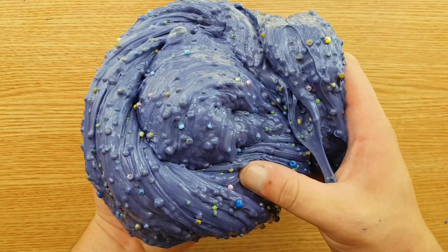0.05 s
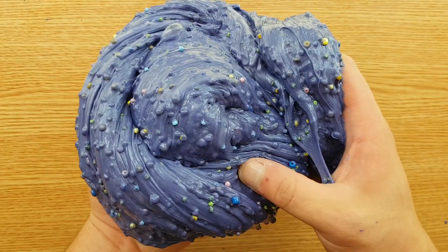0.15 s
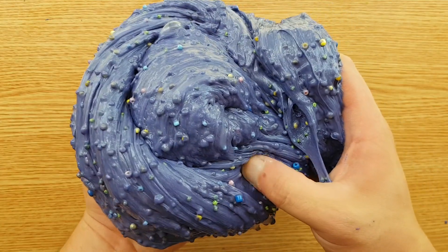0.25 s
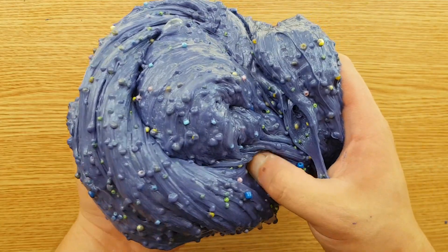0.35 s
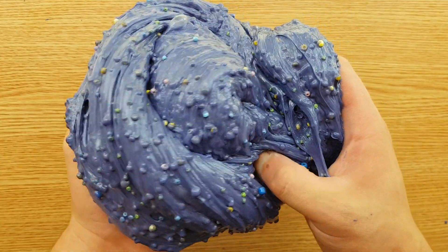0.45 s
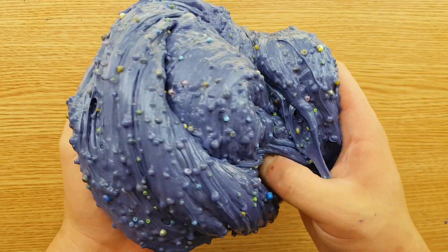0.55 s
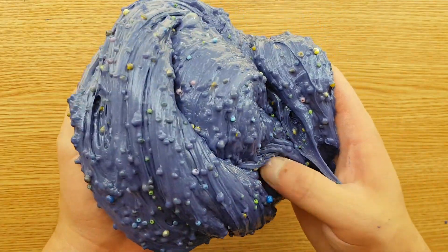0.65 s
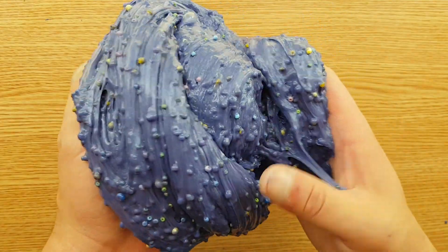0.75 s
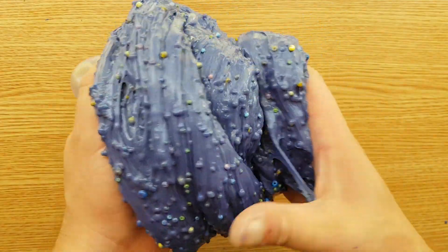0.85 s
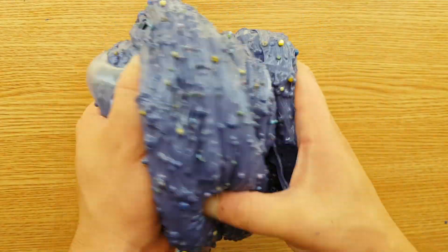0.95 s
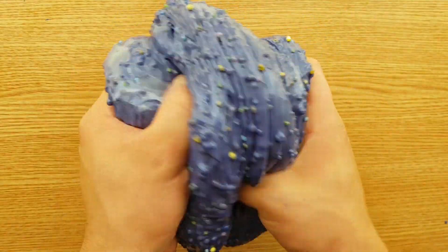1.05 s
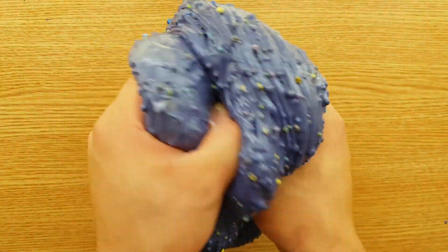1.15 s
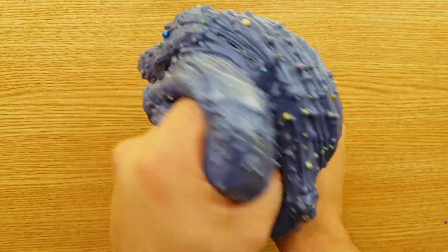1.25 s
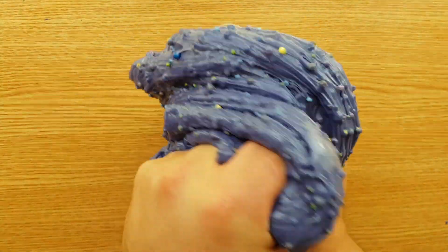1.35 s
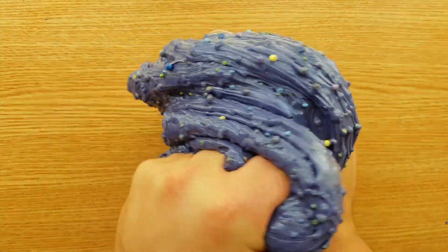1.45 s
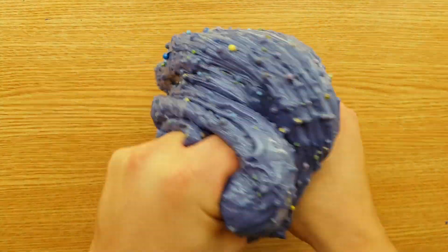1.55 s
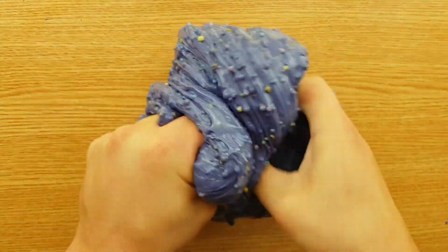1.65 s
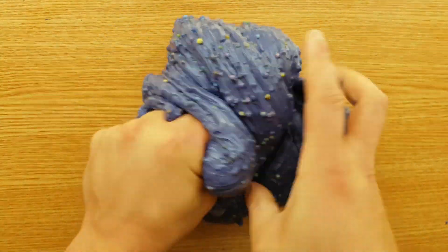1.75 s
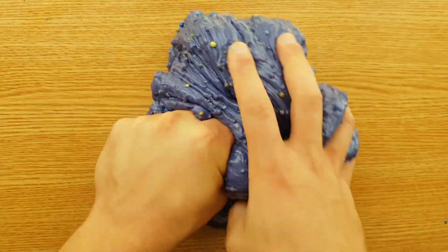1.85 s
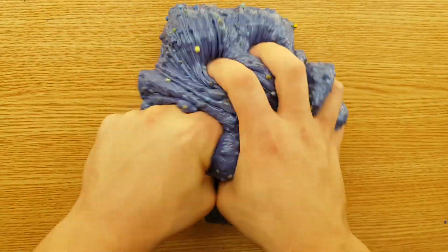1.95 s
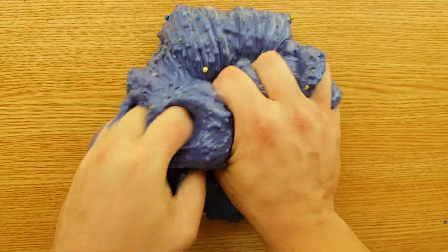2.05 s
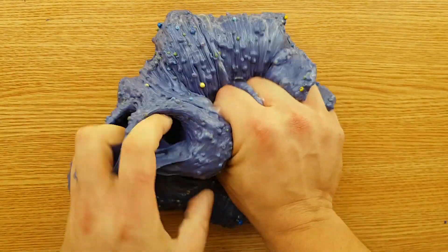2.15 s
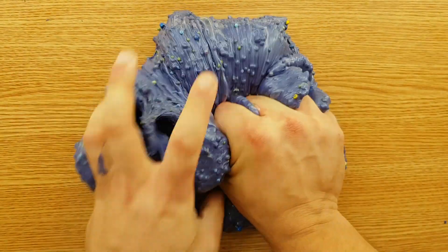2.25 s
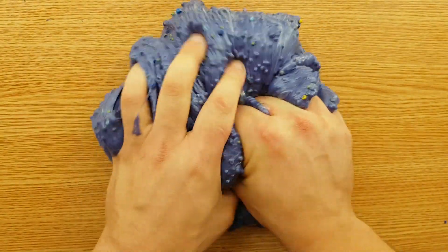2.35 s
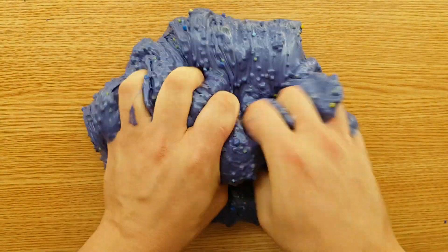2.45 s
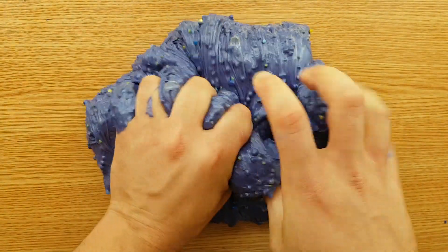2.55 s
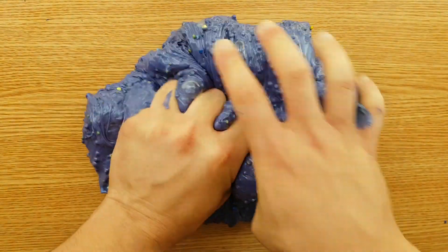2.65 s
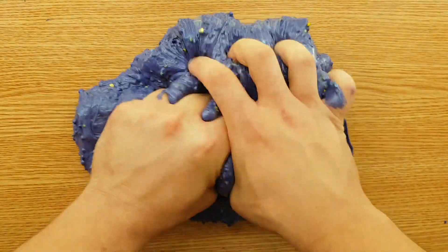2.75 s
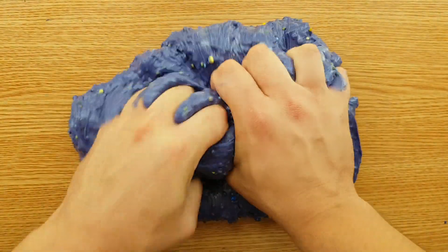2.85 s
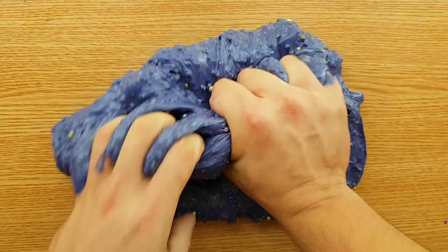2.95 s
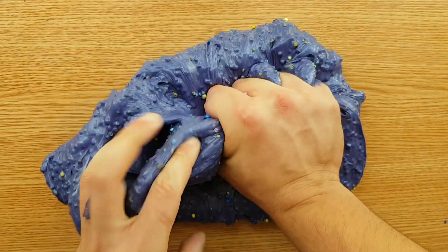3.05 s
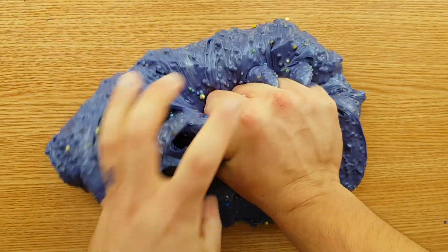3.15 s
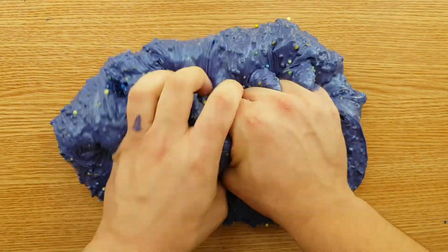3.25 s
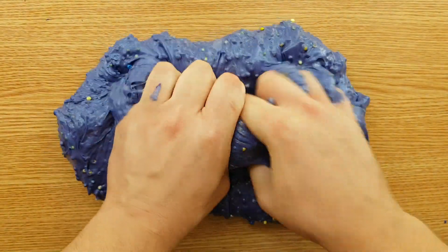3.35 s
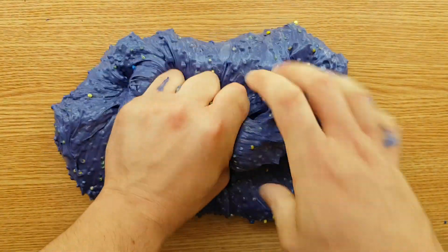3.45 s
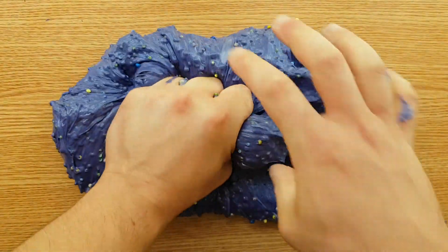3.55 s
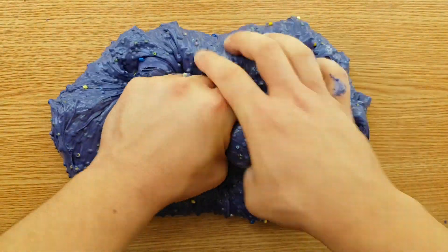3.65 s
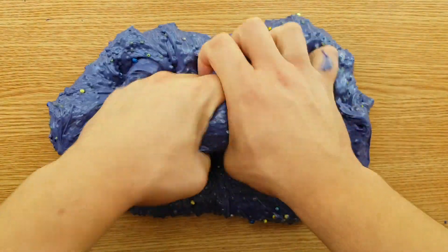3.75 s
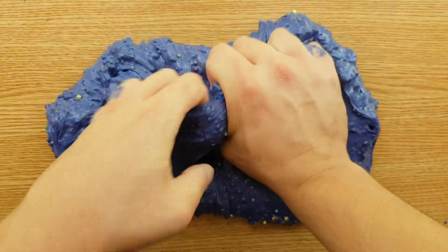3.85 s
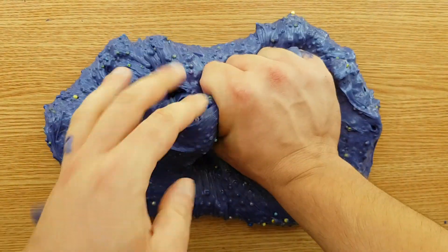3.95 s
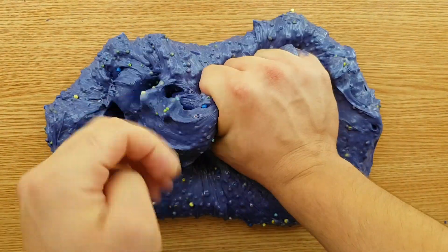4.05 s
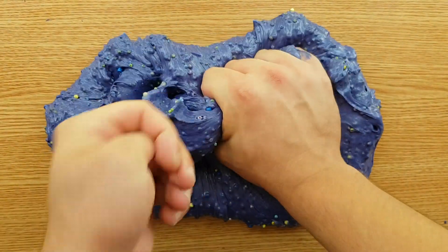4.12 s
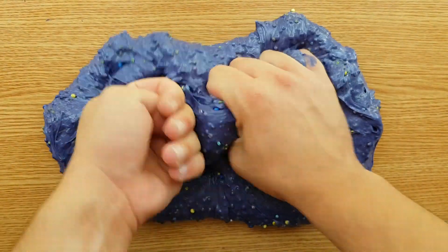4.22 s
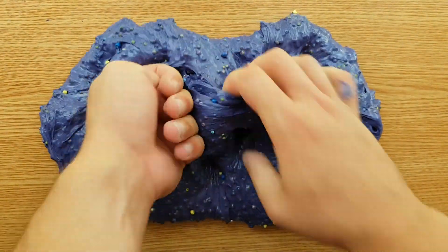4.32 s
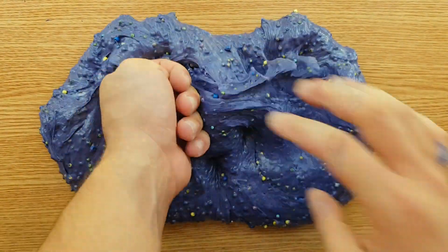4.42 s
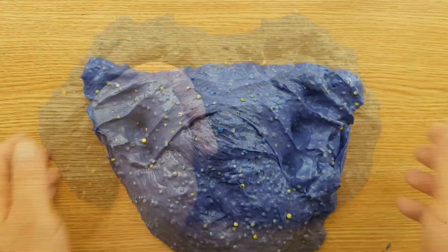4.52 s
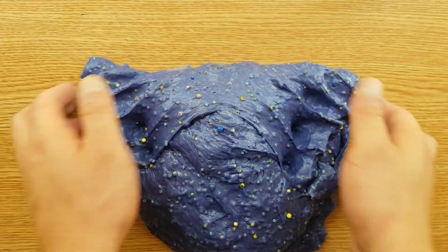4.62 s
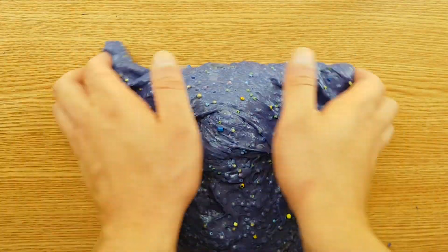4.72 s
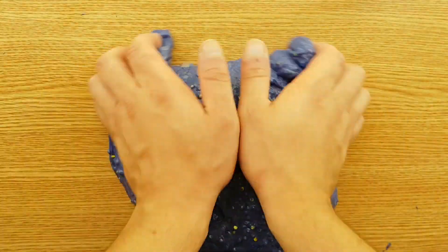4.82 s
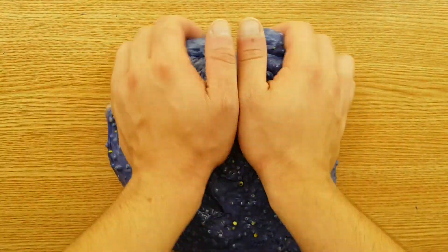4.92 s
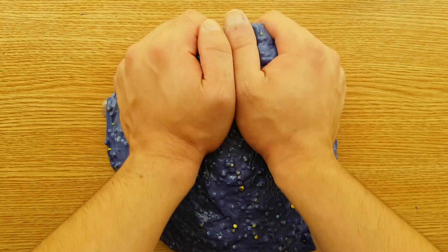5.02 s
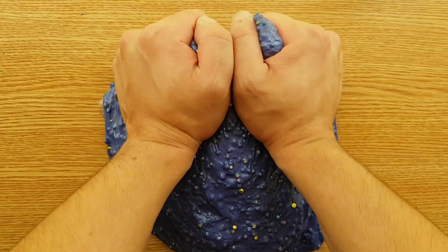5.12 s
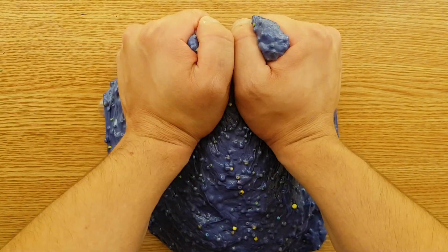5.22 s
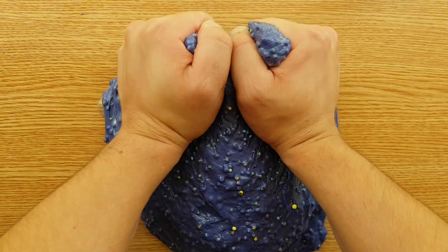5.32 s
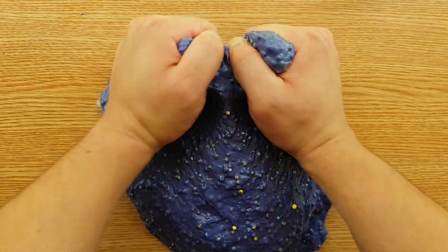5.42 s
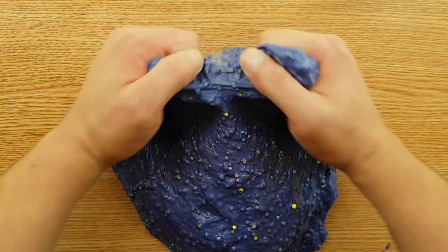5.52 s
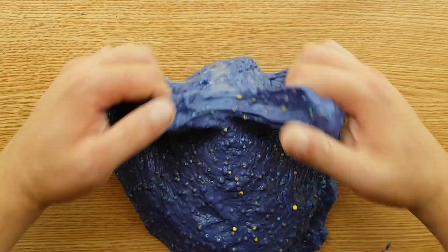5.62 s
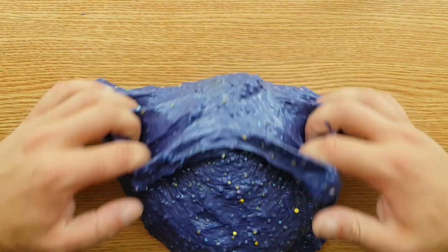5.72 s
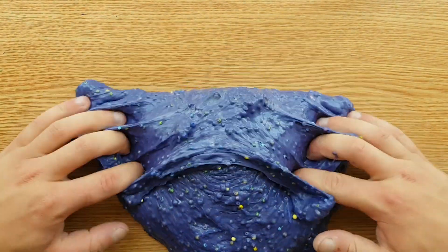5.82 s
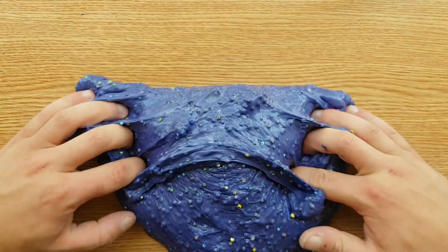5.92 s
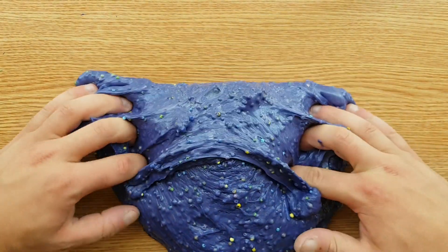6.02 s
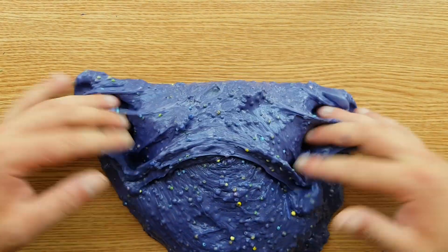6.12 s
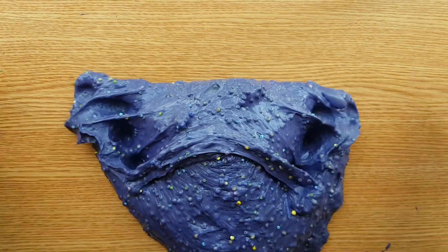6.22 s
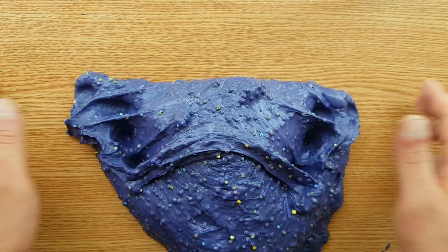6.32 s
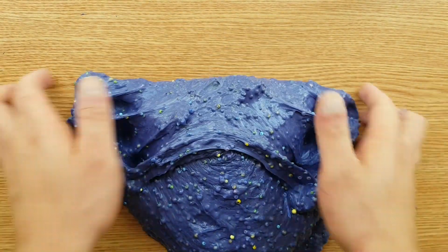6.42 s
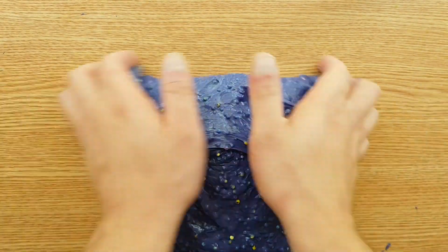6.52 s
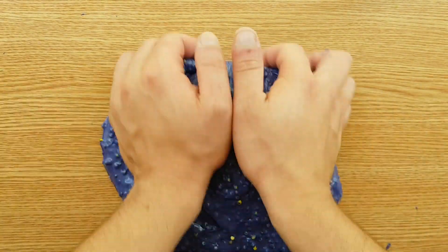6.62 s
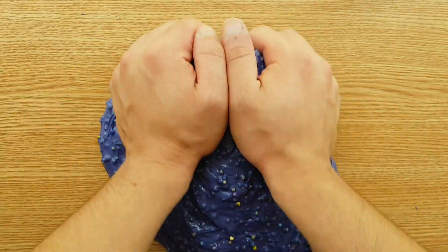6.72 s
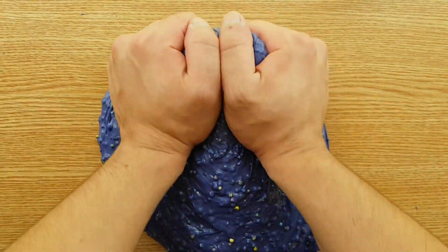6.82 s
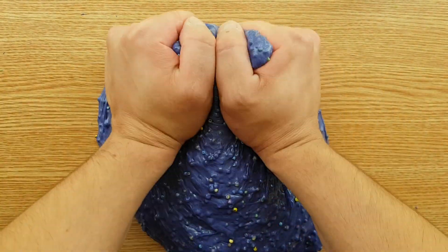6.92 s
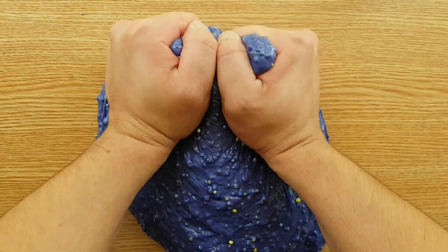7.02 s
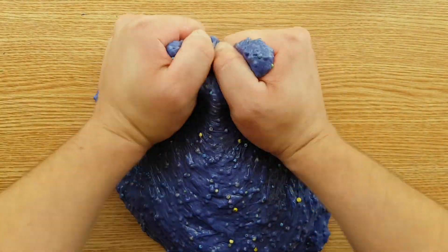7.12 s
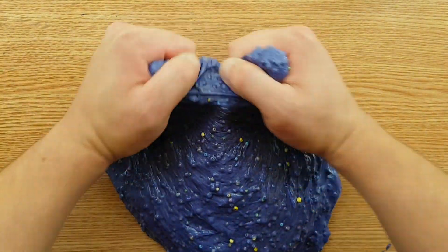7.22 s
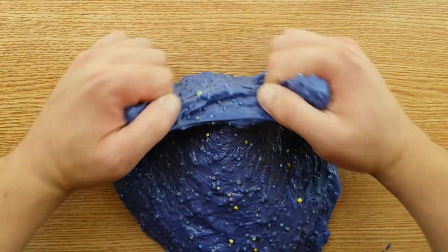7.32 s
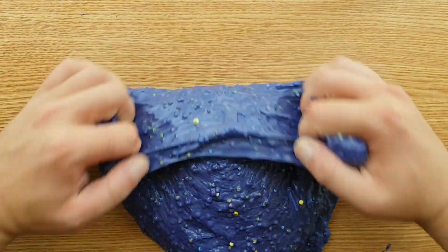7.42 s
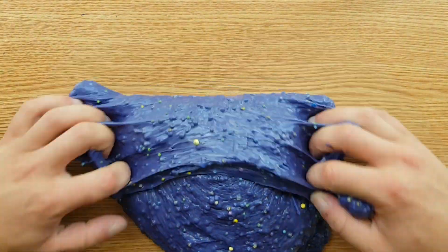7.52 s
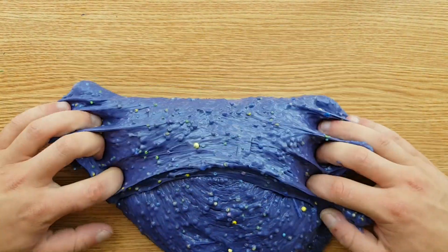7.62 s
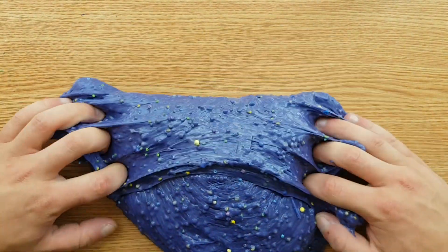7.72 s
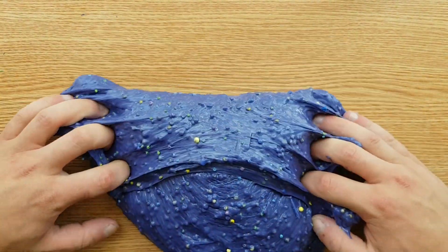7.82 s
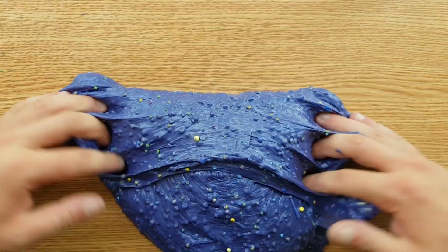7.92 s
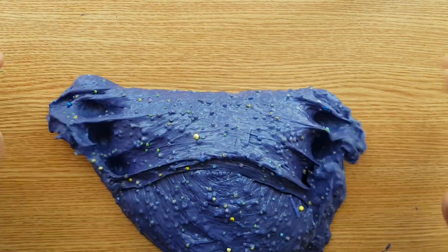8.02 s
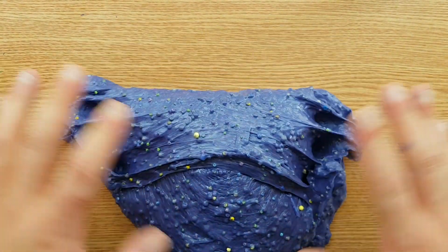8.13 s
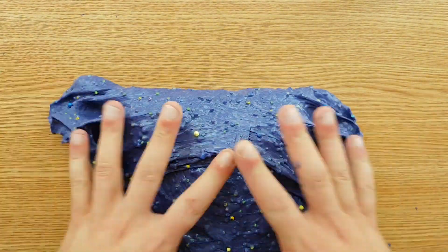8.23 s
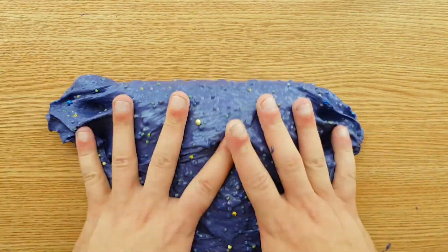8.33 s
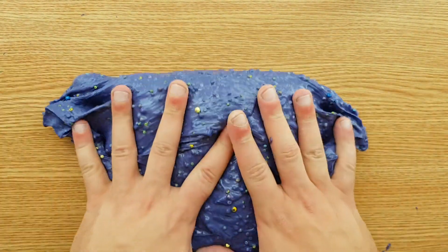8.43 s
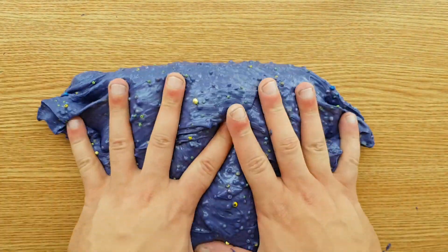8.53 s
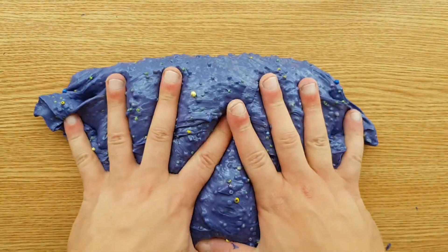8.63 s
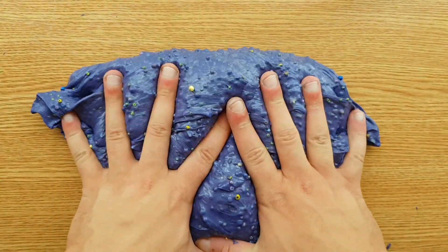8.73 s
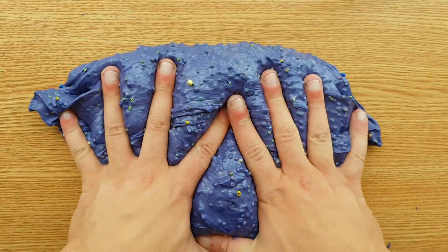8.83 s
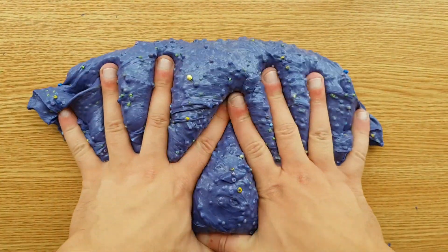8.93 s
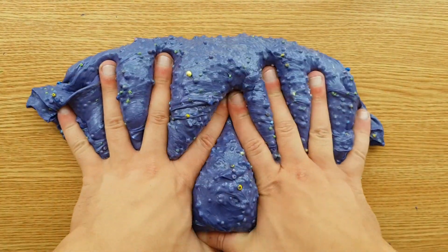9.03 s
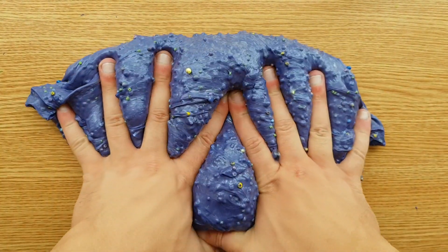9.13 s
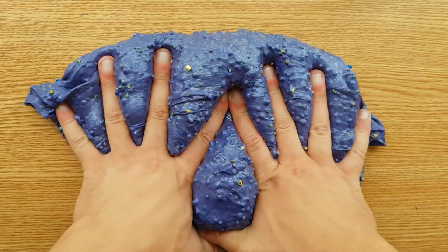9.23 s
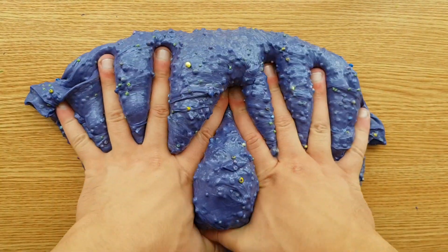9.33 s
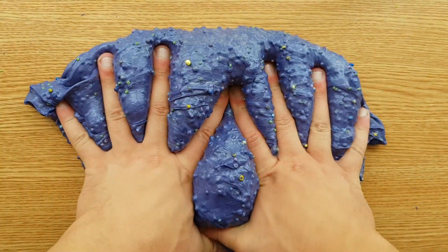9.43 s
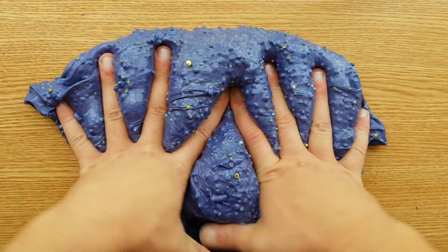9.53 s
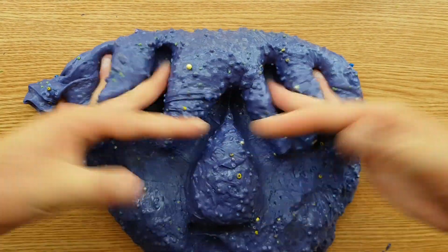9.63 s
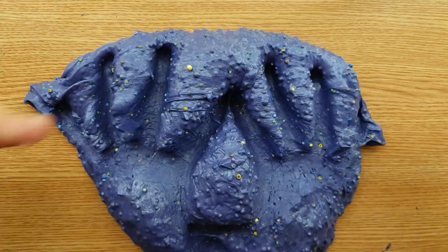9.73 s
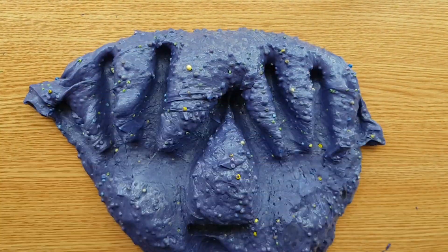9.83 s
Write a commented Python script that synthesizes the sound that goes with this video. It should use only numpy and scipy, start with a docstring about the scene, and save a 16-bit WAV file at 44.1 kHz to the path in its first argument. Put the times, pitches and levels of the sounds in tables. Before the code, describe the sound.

A close, detailed sound of beaded slime being kneaded on a wooden table in a small room, heavily left, with the right faint and dull. The first half second is nearly only quiet hiss. From 0.6 to 1.8 seconds, soft sticky movement and small wet squelches begin. Around 2 seconds crisp pops join, and at 2.65 a strong snap and table thud lead into crackling until 3. A brief lull follows, then popping thickens, peaking near 3.8 to 3.9 with another thud. Squelches and low bumps come at 4.2 to 4.6. A dense crunchy burst fills 5 to 5.2, then slow stretching. At 6.1 there is a bump and click, at 6.3 a tiny low groan, and at 6.8 sharp pops. A short wet crackle hits at 7.9. Sparse, faint ticks remain until a moist peel, pop and deep soft thump at 9.6.

```python
"""Two hands knead a lump of beaded slime on a wooden table in a small room.
Trapped air pockets burst in sharp pops, made of clicks, short noise and a quick ring.
Shaped noise gives the wet squelch, the peeling, the tiny crackling bubbles and squirts of air.
The table thuds in decaying sine tones, rumbles and briefly groans, over a quiet hiss.
The sound sits on the left; the right channel is faint and dull."""
import sys
import numpy as np
from scipy import signal
from scipy.fft import rfft, irfft, next_fast_len
from scipy.io import wavfile

SR = 44100
rng = np.random.default_rng(int(sys.argv[2]) if len(sys.argv) > 2 else 0)


def dump(signal):
    """Clip the signal to [-1, 1] and save it as 16-bit WAV at the path in sys.argv[1]."""
    limited = np.clip(np.atleast_2d(signal).T, -1, 1)
    pcm = np.round(limited * 32767).astype(np.int16)
    wavfile.write(sys.argv[1], SR, pcm)


N = 435266
TIME = np.arange(N) / SR


def from_db(db):
    """Turn decibels into a gain."""
    return np.exp(np.asarray(db) * (np.log(10) / 20))


def rms_one(x):
    """Scale a sound to an average (rms) level of 1."""
    return x / np.sqrt(np.mean(x ** 2) + 1e-20)


def unit_energy(x):
    """Scale a sound to a total energy of 1."""
    return x / np.sqrt(np.sum(x ** 2) + 1e-20)


def in_time(rows):
    """Read each column of a curve at every sample."""
    s, *columns = np.transpose(rows)
    return [np.interp(TIME, s, column) for column in columns]


def at_hz(points, hz):
    """Read a curve over frequency, on a log-frequency axis."""
    f, value = np.transpose(points)
    return np.interp(np.log(np.maximum(hz, 1)), np.log(f), value)


def band(x, low_hz, high_hz):
    """Keep only the frequencies between two limits."""
    edges = [low_hz, min(high_hz, .45 * SR)]
    return signal.sosfilt(signal.butter(2, edges, "band", fs=SR, output="sos"), x)


def colour(x, spectrum):
    """Make each frequency of a long signal louder or softer, as a spectrum says."""
    size = next_fast_len(N + 4096)
    gain = from_db(at_hz(spectrum, np.fft.rfftfreq(size, 1 / SR)))
    return irfft(rfft(x, size) * gain, size)[:N]


def drift(rate):
    """A slow random curve through this many chance values a second, drawn with spread 1."""
    knots = rng.standard_normal(4000)
    return np.interp(TIME * rate, np.arange(len(knots)), knots)


def add(out, s, sound):
    """Mix a sound in at a time."""
    i = int(np.clip(round(s * SR), 0, N - 1))
    out[i:i + len(sound)] += sound[:N - i]


def burst(echo_s, cluster, scatter, scatter_t60, cavity, cavity_cycles):
    """The film snaps, hands and table throw it back within a few ms, the soft cavity rings briefly."""
    t = np.arange(SR // 20) / SR
    snap = scatter * rng.standard_normal(len(t)) * from_db(-60 * t / scatter_t60)
    snap[1] += 1   # the snap itself is a single click
    delays = echo_s * (.1 + rng.random(5))
    snap[(delays * SR).astype(int)] += cluster * rng.uniform(-1.28, 1, 5)
    cycles = 2500 * 5 ** rng.random() * t   # each cavity has its own pitch, 2500 to 12500 Hz
    ring = np.cos(2 * np.pi * cycles) * from_db(-60 * cycles / cavity_cycles)
    return snap + cavity * signal.fftconvolve(snap, unit_energy(ring))[:len(t)]


def strays(crackle, count):
    """Rows for faint pockets that burst at random as the hands work, louder under a harder squeeze."""
    # when strays may burst: (from [s], to [s])
    work_s = (0.46, 7.7)
    typical_db, spread_db, per_s = (-66, -63, -62), 3.0, 6   # typical body, snap and fizz
    follows, reference_db = .6, -61   # share of the crackle's swing followed; crackle level when typical
    s = work_s[0] + np.cumsum(rng.exponential(1 / per_s, count))
    crackle_db = 20 * np.log10(np.interp(s, TIME, crackle))
    push_db = follows * (crackle_db - reference_db)
    levels = np.array(typical_db) + push_db[:, None] + spread_db * rng.standard_normal((count, 3))
    return np.column_stack([s, levels])[s < work_s[1]]


def pops(crackle, body_db, snap_db, fizz_db):
    """Each bursting pocket has its own mix of low body, middle snap and high fizz."""
    # bursting air pockets, levels before the trims and the colouring:
    # (time [s], body level [dB], snap level [dB], fizz level [dB])
    pockets = [(0.751, -63, -65, -61.5), (0.804, -72.5, -74, -57), (0.92, -55, -56, -53),
               (1.0427, -46.5, -43, -62), (1.1, -48, -61, -58), (1.2409, -71, -68, -53),
               (1.3734, -74, -58, -69.5), (1.791, -57, -56, -53), (1.8021, -41, -41.5, -69),
               (1.8759, -71, -54, -48), (1.9402, -50, -43.5, -55), (1.9641, -43, -43, -39),
               (2.0168, -33, -42, -41), (2.0394, -35.5, -24.5, -30.5), (2.1423, -46, -55, -40.5),
               (2.24, -55, -53, -49), (2.313, -70, -59, -46), (2.6094, -50, -55, -34),
               (2.6511, -36, -54, -35), (2.663, -34, -14, -28), (2.7931, -41.5, -30, -24),
               (2.802, -42, -32, -41), (2.8689, -38.5, -43, -25.5), (2.8935, -31, -59, -22),
               (2.923, -46, -24, -23.5), (2.9729, -45.5, -42, -34), (3.0372, -43, -61, -45),
               (3.1898, -53.5, -52.5, -38), (3.2376, -63, -50, -46), (3.2591, -57, -41.5, -55),
               (3.3928, -55, -46, -36.5), (3.4067, -50, -41, -38), (3.422, -38.5, -39.5, -34.5),
               (3.5348, -68, -64, -38), (3.5491, -70, -48, -36), (3.6487, -57, -44, -51),
               (3.676, -41.5, -28.5, -28.5), (3.7664, -48, -43, -45), (3.8001, -30.5, -37, -26.5),
               (3.819, -43, -38, -30), (3.8391, -41, -24.5, -22), (3.8687, -34, -33, -21.5),
               (3.8805, -31, -30, -17), (3.966, -44.5, -40.5, -30), (4.1967, -41, -61, -64),
               (4.4635, -53, -43, -57.5), (4.845, -52, -45, -39), (4.8752, -49, -39, -39),
               (4.9895, -51, -30.5, -40.5), (5.043, -32.5, -41, -32), (5.0563, -38, -26.5, -36),
               (5.086, -55, -47, -29), (5.1026, -34, -26.5, -28), (5.1388, -42, -39, -28.5),
               (5.1657, -34.5, -24.5, -21.5), (5.1853, -38, -30.5, -27.5), (5.243, -48.5, -31.5, -40.5),
               (5.2761, -64, -55, -38.5), (5.7959, -48, -55, -55.5), (5.9793, -68, -68, -61),
               (6.0796, -41.5, -30, -66), (6.1667, -45, -42.5, -54), (6.4928, -51, -48, -41.5),
               (6.5355, -59, -38, -50), (6.7323, -41, -50, -35.5), (6.7615, -25, -28, -34),
               (6.7752, -38, -50, -29.5), (6.8104, -49, -34, -38.5), (6.8783, -41, -59, -33.5),
               (6.924, -40, -30.5, -23), (6.9561, -52, -45, -26), (7.016, -42, -38.5, -32),
               (7.4913, -64, -48, -50.5), (7.5427, -53.5, -55, -51.5), (7.7099, -68, -59, -59),
               (7.9084, -36.5, -29, -39), (7.9162, -40, -36, -45), (7.9296, -31.5, -27, -40),
               (7.9904, -58, -60, -46), (8.032, -62, -64, -44), (8.2739, -61, -56, -48.5),
               (8.3332, -48, -54.5, -68), (8.3477, -57, -54, -66), (8.4723, -75, -57, -72),
               (8.4984, -72, -69.5, -55.5), (8.552, -63, -56, -50.5), (8.6067, -75, -70, -57.5),
               (8.8, -60, -57, -42), (8.8842, -52, -48, -34), (8.9123, -68, -56, -38.5),
               (8.974, -55, -74, -75), (9.0222, -81, -67, -58), (9.0649, -62.5, -80, -82),
               (9.1688, -70, -72, -58), (9.5945, -37, -32.5, -44)]
    # frequency ranges of body, snap and fizz: (low [Hz], high [Hz])
    pop_bands = [(550, 2190), (2200, 5760), (6500, 14700)]
    # the cupped hands and the lump colour every pop: (frequency [Hz], gain [dB])
    pop_colour = [(600, -4.5), (880, 0.5), (1200, 0.5), (1440, -0.5), (1850, -2), (2750, -1), (3500, -3),
                  (4400, -2), (6500, -3), (7600, -3.5), (8700, 1.5), (10500, -1), (12300, 2), (16000, -2)]
    out = np.zeros(N)
    first = round(.006 * SR)   # levels are set over the first 6 ms
    rows = np.vstack([pockets, strays(crackle, count=70)])
    shapes = np.array([burst(echo_s=.0025, cluster=.6, scatter=0.12, scatter_t60=0.039,
                             cavity=0.13, cavity_cycles=3.9) for row in rows])
    sounds = 0
    for k, ((low, high), trim) in enumerate(zip(pop_bands, (body_db, snap_db, fizz_db))):
        part = band(shapes, low, high) * (-1) ** k   # alternating signs join the bands without a notch
        gain = from_db(rows[:, k + 1] + trim) / part[:, :first].std(axis=1)
        sounds = sounds + part * gain[:, None]
    for s, sound in zip(rows[:, 0], sounds):
        add(out, s, sound)
    return colour(out, pop_colour)


def squirts(width, trim_db):
    """Turbulent air in a small gap: one broad resonance that glides as the gap changes."""
    # air squirts through a closing or opening fold, levels before the trim and the fade in and out:
    # (time [s], length [s], start pitch [Hz], end pitch [Hz], rms level [dB])
    air_squirts = [(1.042, 0.013, 3000, 2700, -46.5), (1.182, .027, 420, 500, -56),
                   (1.418, .014, 900, 500, -57), (1.551, 0.15, 1486, 890, -52.5),
                   (2.42, .04, 847, 924, -41.5), (2.453, 0.065, 1507, 1237, -50.5),
                   (2.665, 0.071, 3900, 3470, -36), (3.314, 0.016, 3130, 2900, -43.5),
                   (3.354, 0.024, 1480, 1860, -47), (3.793, 0.014, 1100, 1490, -34),
                   (4.19, .025, 1794, 2100, -48), (4.919, 0.028, 2700, 3090, -50),
                   (5.032, 0.022, 1290, 1490, -46), (6.374, 0.22, 700, 1400, -57),
                   (6.76, .03, 1197, 1500, -40), (7.016, 0.013, 1410, 1500, -41.5),
                   (7.189, 0.035, 1400, 1550, -49.5), (7.93, 0.028, 553, 626, -42.5),
                   (8.331, 0.024, 1100, 1660, -53.5), (8.97, 0.013, 1000, 1200, -59),
                   (9.062, .016, 1083, 1000, -60.5), (9.564, 0.064, 379, 450, -48)]
    out = np.zeros(N)
    t = np.arange(SR // 4) / SR
    for s, length, start_hz, end_hz, level in air_squirts:
        progress = np.minimum(t / max(length, .005), 1)
        hz = start_hz + (end_hz - start_hz) * progress
        # two slow noises around a carrier tone make a noisy band at its pitch
        r = np.exp(-np.pi * width * start_hz / SR)
        noise = rng.standard_normal((2, 2 * len(t)))
        flutter = signal.lfilter([1], [1, -2 * r, r * r], noise)[:, len(t):]
        phase = 2 * np.pi * np.cumsum(hz) / SR
        voice = rms_one(flutter[0] * np.cos(phase) + flutter[1] * np.sin(phase))
        fade = np.sin(np.pi * np.sqrt(progress))
        add(out, s, from_db(level + trim_db) * fade * voice)
    return out


def swell(t, peak_s, rise_s, fall_s):
    """Gain of one push: the fingers take hold, it builds up, rounds off and relaxes."""
    swell_db, crest = 25.5, 0.086   # steepness per rise or fall; share of it that is rounded off
    touch_lead, touch_s = 1.0, .02   # fully in hold this many rises before the peak, after this time
    away = (t - peak_s) / np.where(t < peak_s, max(rise_s, .005), max(fall_s, .005))
    hold = np.clip((t - peak_s + touch_lead * rise_s) / touch_s + 1, 0, 1)
    return hold * from_db(-swell_db * (np.hypot(away, crest) - crest))


def effort():
    """Gains of squelch, peeling, crackle and rumble: squeezes add in power to creep and resting weight."""
    # one row per grip, push or pull, levels before the trims: (peak time [s], rise [s], fall [s],
    # squelch level [dB], peeling level [dB], crackle level [dB], table rumble level [dB])
    squeezes = [(0.65, 0.08, 0.073, -80, -63.5, -59, -80), (0.77, .07, .14, -78.5, -72, -80, -66),
                (1.06, .04, 0.21, -59.5, -56.5, -58, -64), (1.26, 0.51, 0.17, -64, -66, -65, -65.5),
                (1.57, 0.19, 0.2, -50, -50.5, -52.5, -56.5), (1.68, 0.12, 0.066, -50.5, -57.5, -61, -72),
                (1.8, .03, .06, -62, -71, -57, -58.5), (2.02, 0.15, 0.19, -46, -49, -47.5, -55),
                (2.191, 0.025, 0.041, -46.5, -55, -56, -59), (2.42, 0.19, 0.27, -47, -48, -48, -53),
                (2.674, 0.039, .14, -51, -38.5, -42.5, -43.5), (2.91, 0.21, 0.15, -49, -47.5, -46, -54),
                (3.04, 0.036, 0.055, -61, -54, -62, -63), (3.17, 0.022, .07, -75, -76, -84, -56.5),
                (3.35, 0.19, 0.12, -48.5, -48.5, -52, -54.5), (3.53, 0.063, 0.23, -78, -60, -67, -81),
                (3.68, 0.048, 0.22, -58, -54, -49, -58), (3.81, 0.11, 0.16, -46, -42, -38, -46.5),
                (3.885, 0.042, .08, -49, -54, -33.5, -57), (4.215, 0.075, .14, -46.5, -48, -50, -49),
                (4.275, .04, 0.13, -52.5, -51, -52.5, -66), (4.485, 0.058, 0.13, -53, -49, -52, -44.5),
                (4.6, 0.028, 0.21, -54.5, -68, -83, -50.5), (4.78, 0.17, 0.45, -54.5, -53, -50.5, -58),
                (4.93, 0.054, 0.072, -67, -47, -51, -66), (5.05, 0.049, 0.072, -41, -47, -42, -51.5),
                (5.125, 0.13, 0.15, -55, -40.5, -38, -57), (5.46, 0.19, 0.39, -55, -54.5, -55.5, -64),
                (5.62, 0.19, 0.24, -72, -69, -60, -64), (6.1, 0.032, .13, -53, -43.5, -50.5, -47.5),
                (6.43, 0.22, 0.14, -55, -71, -78, -55.5), (6.51, 0.082, 0.22, -50, -47.5, -49.5, -53.5),
                (6.67, 0.15, 0.075, -62, -54, -54.5, -62), (6.77, 0.021, 0.058, -42, -49, -40, -47),
                (6.82, .04, 0.32, -49.5, -50, -44, -59), (6.97, 0.19, 0.13, -65.5, -66, -64, -54.5),
                (7.23, 0.28, .16, -55.5, -56, -57, -62), (7.42, 0.22, 0.32, -64, -65.5, -58, -73),
                (7.93, 0.048, 0.099, -45, -41, -44, -43.5), (8.274, 0.032, 0.069, -72, -71, -69, -58.5),
                (8.35, .04, .1, -62.5, -70, -72, -71.5), (8.899, 0.02, 0.033, -58.5, -68, -43.5, -65.5),
                (9.49, 0.035, 0.15, -62.5, -53, -50, -55), (9.585, 0.12, .15, -44, -42, -44, -43)]
    # the lump keeps creeping between squeezes, before offsets and trims: (time [s], level [dB])
    creep_curve = [(0, -81.5), (0.5, -78.5), (1.3, -69), (2.8, -70), (3.12, -90), (3.5, -71.5), (4.1, -70),
                   (5.7, -74), (6.0, -77), (7.1, -69), (7.75, -74.5), (8.15, -78), (8.5, -74), (9.0, -75.5),
                   (9.35, -79.5), (9.87, -77.5)]
    # offsets of the creep: (squelch [dB], peeling [dB], crackle [dB])
    creep_offsets = (2, 0, -0.5)
    resting_weight_db = -73   # rumble of the table under resting hands, before its trim
    t = TIME[::32]   # slow curves need few points
    creep = np.interp(t, *np.transpose(creep_curve))
    base_db = [creep + db for db in creep_offsets] + [np.full(len(t), resting_weight_db)]
    power = from_db(base_db) ** 2
    for peak_s, rise_s, fall_s, *levels in squeezes:
        power = power + np.outer(from_db(levels), swell(t, peak_s, rise_s, fall_s)) ** 2
    return [np.interp(TIME, t, np.sqrt(p)) for p in power]


def grains(per_s, spread_db, ring_t60, smooth):
    """Tiny bubbles of uneven size burst in clumps, over the smooth hiss of sliding slime."""
    born = np.flatnonzero(rng.random(N) < per_s * from_db(4 * drift(30)) / SR)
    sizes = from_db(spread_db * np.minimum(rng.exponential(1, N)[born], 3))
    t = np.arange(SR // 60) / SR
    shapes = rng.standard_normal((64, len(t))) * from_db(-60 * t / ring_t60)
    out = np.zeros(N + len(t))
    for i, size in zip(born, sizes):
        out[i:i + len(t)] += size * shapes[i % len(shapes)]
    return rms_one(rms_one(out[:N]) + smooth * rng.standard_normal(N))


def folds(x, low_hz, high_hz, patchy_db, count):
    """Folds open and close, so narrow resonances come and go."""
    edges = np.geomspace(low_hz, high_hz, count + 1)
    out = 0
    for k, (low, high) in enumerate(zip(edges, edges[1:])):
        out = out + band(x, low, high) * from_db(patchy_db * drift(50)) * (-1) ** k
    return out


def kneading(squelch, peel, crackle, squelch_db, peel_db, crackle_db):
    """Wet squelch, skin peeling off slime, and the finest bubbles, each from coloured grains."""
    # wet squelch, relative: (frequency [Hz], gain [dB])
    squelch_spectrum = [(200, -13.5), (300, -1), (400, -2), (620, -7), (900, 0.5), (1400, -4.5),
                        (2200, -12), (3500, -35), (8000, -59.5)]
    # skin peeling off slime, relative: (frequency [Hz], gain [dB])
    peel_spectrum = [(1000, -16), (1700, -2.5), (2700, -0.5), (4200, -5.5), (6000, -18.5), (9000, -33)]
    # finest bubbles, relative: (frequency [Hz], gain [dB])
    crackle_spectrum = [(1000, -39.5), (3200, -16), (5200, 0), (7000, -2), (8800, -0.5), (12000, -0.5),
                        (16000, -4)]
    wet = grains(per_s=550, spread_db=4.5, ring_t60=0.013, smooth=.55)
    wet = folds(wet, 198.7, 8100.0, patchy_db=3.0, count=20)
    fine = grains(per_s=500, spread_db=5.0, ring_t60=.016, smooth=.75)
    return (squelch * from_db(squelch_db) * rms_one(colour(wet, squelch_spectrum))
            + peel * from_db(peel_db) * rms_one(colour(wet, peel_spectrum))
            + crackle * from_db(crackle_db) * rms_one(colour(fine, crackle_spectrum)))


def table(weight, bump_db, rumble_db, contact_s):
    """Soft bumps ring the table top in decaying tones; shifting weight makes it rumble."""
    # the lump and the hands bump the table, before the trim: (time [s], peak level [dB])
    bumps = [(0.751, -49.5), (1.42, -46), (2.029, -45), (2.652, -33), (2.672, -40.5), (2.89, -48),
             (3.8, -33.5), (4.19, -44), (4.465, -46.5), (4.581, -33), (4.625, -41.5), (4.675, -50),
             (6.08, -42.5), (6.76, -41.5), (7.929, -46), (9.55, -40.5), (9.595, -41)]
    # typical tones of the table top: (frequency [Hz], level [dB], time to fall by 60 dB [s])
    table_tones = [(72, -23.5, .13), (117.8, -8.5, 0.14), (148.4, -3.5, 0.19), (185.6, -2, 0.12),
                   (235, -7, 0.13), (299.6, -10.5, .08), (413, -11.5, 0.074)]
    # table rumble, relative: (frequency [Hz], gain [dB])
    rumble_spectrum = [(40, -19), (85, -6.5), (145, 3), (220, -3), (340, -11.5), (600, -19.5),
                       (1500, -44.5), (4000, -80)]
    out = np.zeros(N)
    t = np.arange(SR // 3) / SR
    for s, level in bumps:
        thud = 0
        for hz, db, t60 in table_tones:   # each bump excites the tones a little differently
            fade = from_db(db + rng.normal(0, 6.1) - 60 * t / t60)
            thud = thud + fade * np.sin(2 * np.pi * (hz * rng.normal(1, 0.041) * t + rng.random()))
        thud = thud * (1 - np.exp(-t / contact_s))   # a soft contact rounds the start
        add(out, s, from_db(level + bump_db) * thud / np.abs(thud).max())
    rumble = rms_one(colour(rng.standard_normal(N), rumble_spectrum))
    return out + weight * from_db(rumble_db) * rumble


def judder():
    """Stick and slip under a sliding touch make a short groan: one sine of gliding pitch and level."""
    # the table judders under a sliding touch: (time [s], pitch [Hz], rms level [dB])
    groan = [(6.25, 161, -100), (6.275, 156, -51), (6.312, 140, -38.5), (6.33, 128, -40), (6.365, 129, -63),
             (6.39, 133, -43.5), (6.44, 125, -100)]
    hz, level = in_time(groan)
    return np.sqrt(2) * from_db(level) * np.sin(2 * np.pi * np.cumsum(hz) / SR)


def slump():
    """The released slime slumps and the whole table sways: a deep, soft thump of low noise."""
    # one slump: (peak time [s], rise [s], fall [s], rms level at the peak [dB])
    slump_shape = (9.63, 0.1, 0.2, -50.5)
    peak_s, rise_s, fall_s, db = slump_shape
    low_noise = rms_one(band(rng.standard_normal(N), 30, 103))
    return from_db(db) * swell(TIME, peak_s, rise_s, fall_s) * low_noise


def room(x, build_s):
    """Echoes blur into a noisy tail that builds up quickly and dies away at its own rate in each band."""
    # room reverberation: (frequency [Hz], time to fall by 60 dB [s])
    room_t60 = [(200, 0.2), (1000, 0.28), (3500, 0.2356), (9000, 0.33), (16000, 0.29)]
    # balance of the noise bands in the tail: (frequency [Hz], gain [dB])
    room_colour = [(200, 0), (1000, 3), (3000, 3.5), (6000, -3), (9000, 4.5), (16000, -8.5)]
    t = np.arange(SR // 2) / SR
    edges = np.geomspace(120, 17000, 9)
    tail = 0
    for low, high in zip(edges, edges[1:]):
        hz = np.sqrt(low * high)   # middle of the band
        fade = from_db(at_hz(room_colour, hz) - 60 * t / at_hz(room_t60, hz))
        tail = tail + band(rng.standard_normal(len(t)), low, high) * fade
    tail = unit_energy(tail * (1 - np.exp(-t / build_s)))
    return signal.oaconvolve(x, tail)[:N]


def background_hiss():
    """Steady coloured noise, separate for left and right, whose level dips briefly."""
    # left background, relative: (frequency [Hz], gain [dB])
    left_tone = [(15, -13), (30, -2.5), (60, 0.5), (100, -4.5), (150, -6.5), (220, -11.5), (450, -13),
                 (1000, -21), (2500, -24), (5000, -33.5), (9000, -45), (15000, -28)]
    # right background, relative: (frequency [Hz], gain [dB])
    right_tone = [(15, -16), (30, -5.5), (60, -6.5), (100, -6.5), (150, -7), (220, -7.5), (450, -10),
                  (1000, -15), (2500, -21.5), (5000, -32), (9000, -38.5), (15000, -29)]
    # rms levels before the dip curve is added: (left [dB], right [dB])
    floor_db = [-67.5, -64]
    # the hiss starts slightly raised, dips briefly, then settles a little lower: (time [s], gain [dB])
    hiss_dip = [(2.7, 1), (3.08, -5), (3.45, -2), (3.8, 0)]
    floor = [from_db(db) * rms_one(colour(rng.standard_normal(N), tone))
             for db, tone in zip(floor_db, (left_tone, right_tone))]
    return from_db(in_time(hiss_dip)[0]) * np.array(floor)


def scene():
    """Slime and table close by, the room behind them, a quiet hiss under everything."""
    # how much the right channel picks up: (frequency [Hz], gain [dB])
    right_pickup = [(60, -6.5), (150, -11), (350, -12), (700, -19), (1400, -25), (2800, -26), (5600, -31.5),
                    (9000, -31), (15000, -29.5)]
    squelch, peel, crackle, weight = effort()
    popping = pops(crackle, body_db=-1.5, snap_db=-2.5, fizz_db=-0.66)
    popping = popping + squirts(width=.3, trim_db=1.0)
    slime = popping + kneading(squelch, peel, crackle, squelch_db=-1.7, peel_db=-0.88, crackle_db=0.66)
    thuds = table(weight, bump_db=3.5, rumble_db=-0.15, contact_s=0.00094) + judder() + slump()
    left = slime + thuds + from_db(-12.5) * room(popping, build_s=0.0016)
    right_room = from_db(-4.5) * room(slime + .5 * thuds, build_s=.001)
    right = colour(from_db(-3.5) * slime + thuds + right_room, right_pickup)
    return np.array([left, right]) + background_hiss()


def record(dry):
    """A steep filter cuts the treble above 16 kHz; peaks stop at full scale."""
    treble_cut = signal.ellip(10, .2, 80, 16000, fs=SR, output="sos")
    return np.clip(signal.sosfilt(treble_cut, dry), -1, 1)


dry = scene()
out = record(dry)
dump(out)
```